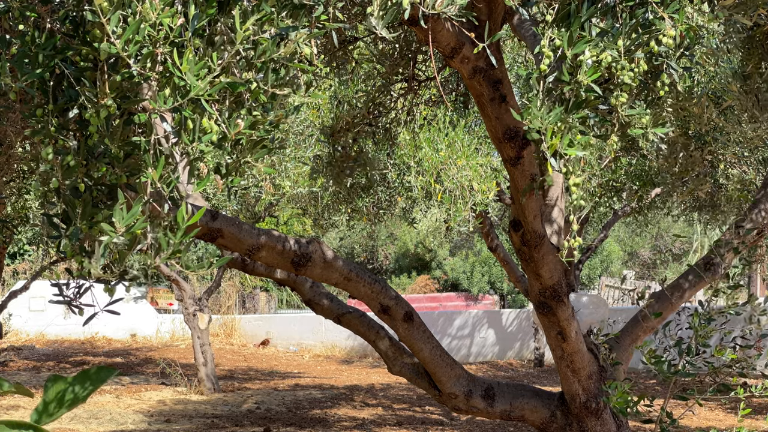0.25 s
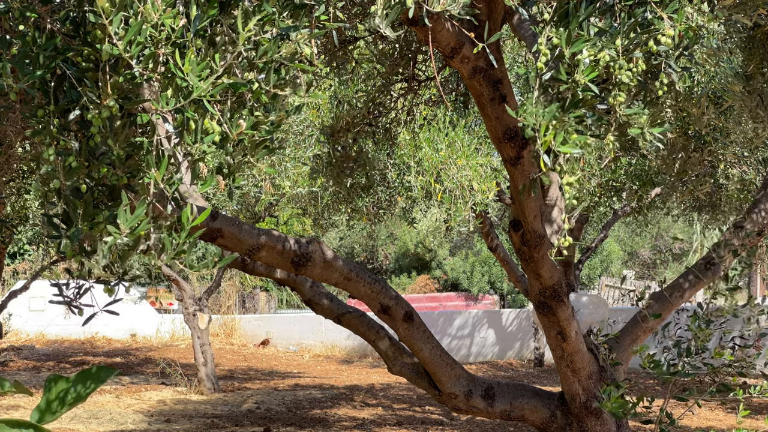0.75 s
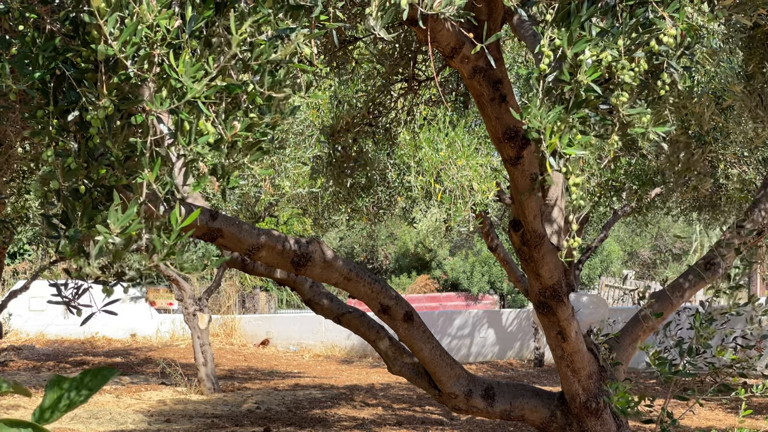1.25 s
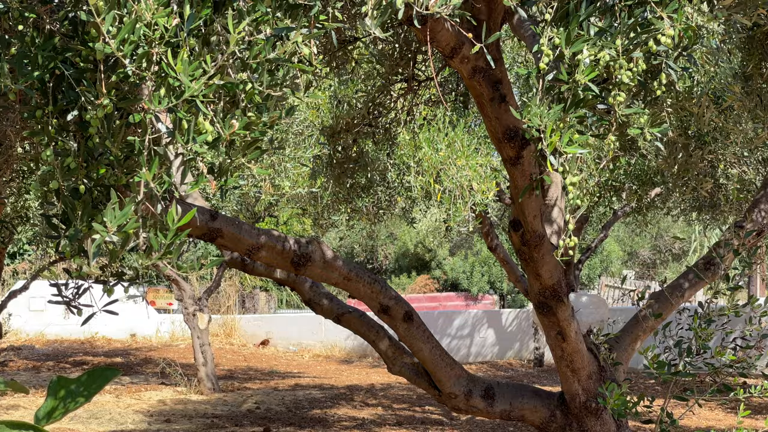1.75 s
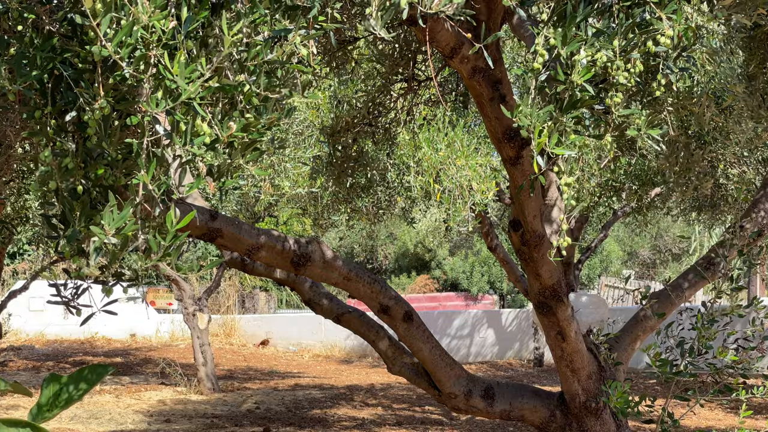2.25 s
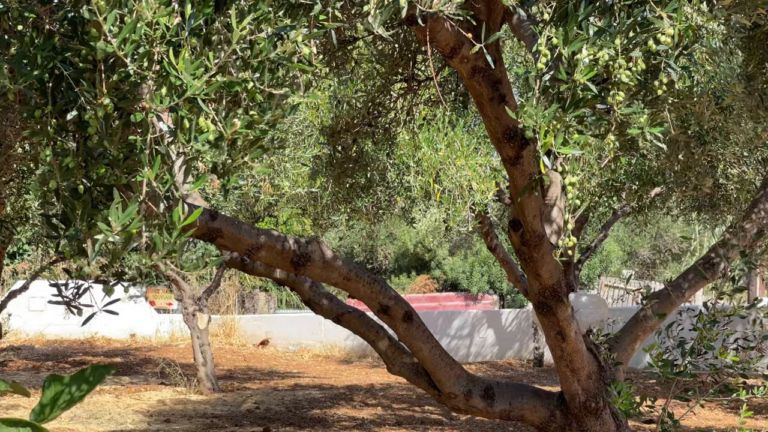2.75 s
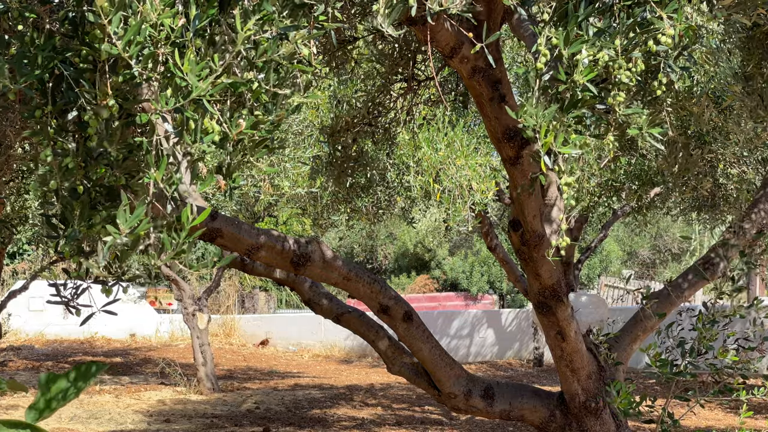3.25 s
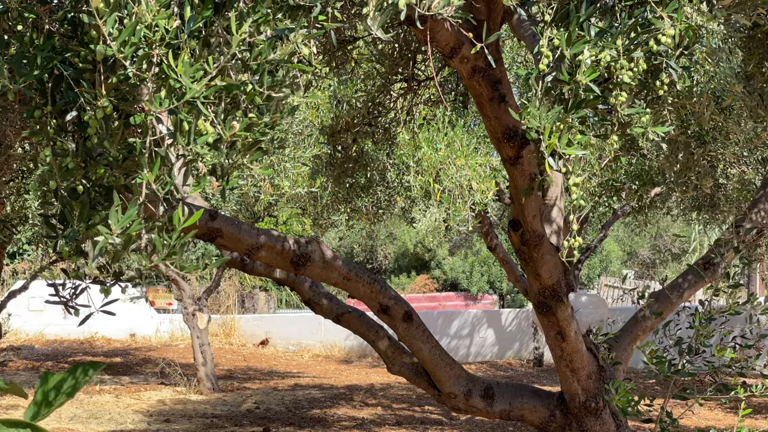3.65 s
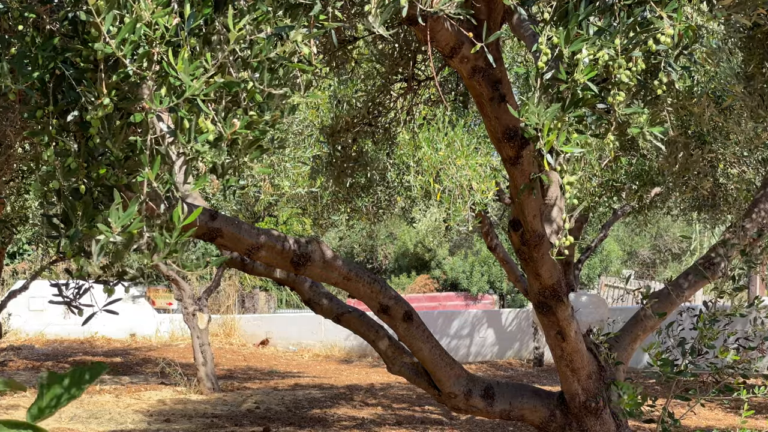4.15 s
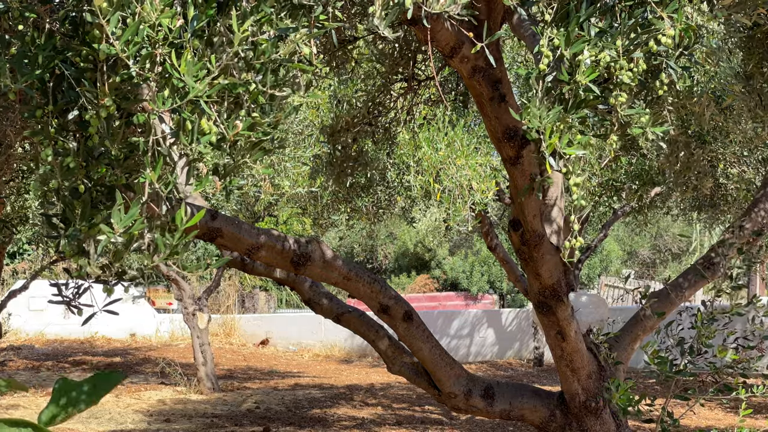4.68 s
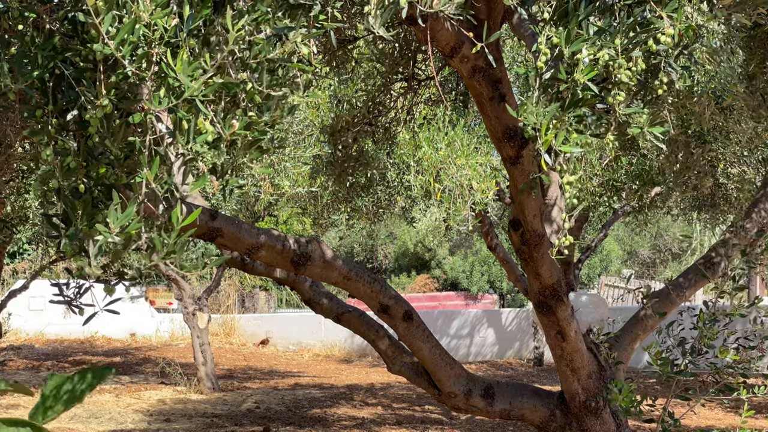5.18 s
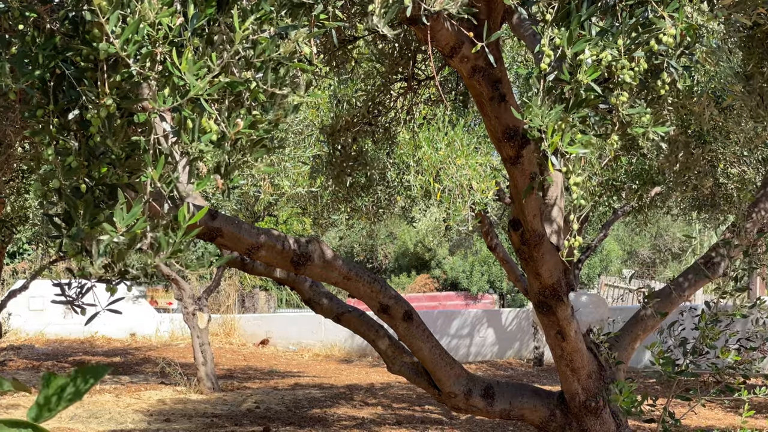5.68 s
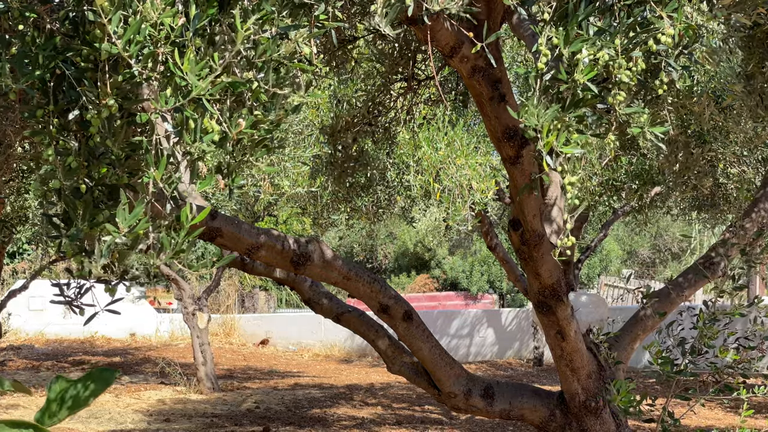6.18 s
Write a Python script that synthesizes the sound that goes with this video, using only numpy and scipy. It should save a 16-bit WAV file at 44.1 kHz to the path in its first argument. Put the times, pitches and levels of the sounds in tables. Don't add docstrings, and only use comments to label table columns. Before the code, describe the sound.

Bright, buzzing cicadas pulse about three times a second in an olive grove, with a distant low motor drone and soft rumble underneath.

```python
import sys
import numpy as np
from scipy import signal
from scipy.fft import rfft, irfft, next_fast_len
from scipy.io import wavfile
from scipy.ndimage import uniform_filter1d, map_coordinates

SR = 44100
rng = np.random.default_rng(int(sys.argv[2]) if len(sys.argv) > 2 else 0)


def to_wav(s):
    ch = np.atleast_2d(s).T
    pcm = np.round(np.clip(ch, -1, 1) * 32767)
    wavfile.write(sys.argv[1], SR, pcm.astype(np.int16))


def decibels_to_gain(level_db):
    exponent = np.asarray(level_db, float) / 20
    return 10 ** exponent


N = 283122
OPPOSITE = np.array([[1], [-1]])


def unit(x):
    return x / np.sqrt(np.mean(x ** 2) + 1e-20)


def along(points, hz):
    f, v = np.transpose(points)
    return np.interp(np.log(hz + 1), np.log(f + 1), v)


def curves(rows):
    s, *cols = np.transpose(rows)
    return [np.interp(np.arange(N) / SR, s, c) for c in cols]


def wobble(rate_hz):
    knots = rng.standard_normal(int(N * rate_hz / SR) + 4)
    return map_coordinates(knots, [np.arange(N) * rate_hz / SR])


def filtered(x, response):
    m = next_fast_len(N + 8192)
    return irfft(rfft(x, m) * response(np.fft.rfftfreq(m, 1 / SR)), m)[..., :N]


def cicadas():
    near, crowd = voices()
    drive = unit(patchy(near + decibels_to_gain(4.0) * crowd, depth_db=0.5))
    overtone_drive = unit(patchy(near + decibels_to_gain(9.0) * crowd, depth_db=1.0))
    song = body(drive, overtone_drive)
    unlike_part = body(*rng.standard_normal((2, N)))
    return song + decibels_to_gain(-16.0) * unlike_part * OPPOSITE


def voices():
    # (time [s], slow singer's share [0-1], fast click rate [Hz])
    turns = [(0, .2, 243), (1.15, .2, 242), (1.25, .8, 241), (1.45, .3, 241), (1.65, .8, 241),
             (1.85, .3, 243), (2.3, .5, 240), (2.6, .9, 246), (3.3, .7, 250), (4.3, .8, 250),
             (4.45, .4, 250), (4.65, .8, 248), (5.05, .9, 250), (5.2, .1, 250), (6.05, .3, 252),
             (6.2, .8, 250), (6.42, .8, 250)]
    slow_hz = 224
    share, fast_hz = curves(turns)
    slow = clicks(slow_hz, sharp=1.1, drift=.006, steady=0.35)
    fast = clicks(fast_hz, sharp=1.1, drift=.006, steady=0.35)
    crowd_hz = rng.uniform(190, 270, size=6)
    crowd = sum(clicks(rate_hz, sharp=0.35, drift=.01, steady=0.35) for rate_hz in crowd_hz)
    near = np.sqrt(share) * slow + np.sqrt(1 - share) * fast
    return unit(near), unit(crowd)


def clicks(rate_hz, sharp, drift, steady):
    turn = np.cumsum(rate_hz * (1 + drift * wobble(5))) / SR + rng.random()
    pull = np.exp(sharp * (np.cos(2 * np.pi * turn) - 1))
    pull_sizes = decibels_to_gain(0.41 * rng.standard_normal(2 * N // 100))
    size = pull_sizes[turn.round().astype(int)]
    ribs = rng.standard_normal(200)[(turn % 1 * 200).astype(int)]
    steady = np.clip(steady, 0, 1)
    crackle = np.sqrt(steady) * ribs + np.sqrt(1 - steady) * rng.standard_normal(N)
    return unit(pull * size * crackle)


def patchy(x, depth_db):
    z = signal.stft(x, nperseg=512)[2]
    field = uniform_filter1d(rng.standard_normal(z.shape), 3, 0)
    field = uniform_filter1d(field, 16, 1)
    return signal.istft(z * decibels_to_gain(depth_db * unit(field)), nperseg=512)[1][:N]


def body(drive, overtone_drive):
    # (frequency [Hz], density [dB per Hz])
    air_sac = [(1500, -74), (1800, -29), (2250, -7.5), (2500, -1), (3000, -0.5), (3280, -3.5),
               (3550, -10.5), (4000, -15), (4400, -33)]
    tymbal_shape = [(3800, -68), (4250, -26), (4800, -9.5), (5050, -1.5), (5300, 0.5), (5500, -3),
                    (5800, -10.5), (6300, -31), (7000, -60)]
    overtones = [(5000, -50.5), (5700, -8), (6100, -1.5), (7000, -6), (7400, -1), (7900, -3.5),
                 (8400, -8.5), (8800, -13), (9500, -14), (10500, -8.5), (11400, -15), (12100, -20)]
    # (frequency [Hz], gain [dB])
    air_loss = [(11900, 3.5), (13200, -8), (13600, -18), (14000, -30), (14500, -90)]
    # (frequency [Hz], width [Hz], level [dB])
    rib_modes = [(2790, 140, 0), (3306, 81, 5), (5290, 180, 3), (5620, 98, 5.5), (7900, 81, 4),
                 (8120, 37, 6), (8560, 70, 7), (9040, 56, 3.5), (11120, 90, 2.5), (12100, 60, 0)]
    tymbal_hz = 5300

    def ring(x, shape, tune):
        def response(hz):
            ribs_db = sum(db / (1 + (2 * (hz - c) / w) ** 2) for c, w, db in rib_modes)
            return decibels_to_gain(along(shape, hz / tune) + along(air_loss, hz) + ribs_db)
        return unit(filtered(x, response))

    tymbal_gain, overtone_gain, sac_gain, pitch_hz = phrasing()
    high = np.clip((pitch_hz / tymbal_hz - .96) / .07, 0, 1)
    tymbal = (1 - high) * ring(drive, tymbal_shape, 0.96) + high * ring(drive, tymbal_shape, 1.0063)
    song = decibels_to_gain(0.4) * tymbal_gain * tymbal
    song = song + decibels_to_gain(0.28) * overtone_gain * ring(overtone_drive, overtones, 1)
    return song + sac_gain * ring(drive, air_sac, 0.99)


def phrasing():
    # (start [s], length [s], level at the stop [dB], tymbal over overtones [dB])
    phrases = [(-0.073, 0.224, -29.0, 1), (0.168, 0.25, -32, 3.5), (0.084, 0.21, -34, -4),
               (0.384, 0.27, -30.0, 2), (0.67, 0.27, -30.5, 1.3), (0.965, 0.27, -32.1, 1.5),
               (1.015, 0.291, -34.0, 2), (1.344, 0.24, -30, 3.1), (1.488, 0.21, -33.5, 1.9),
               (1.713, 0.24, -33, 4), (1.789, 0.25, -32, 1), (1.988, 0.34, -39.5, 0.5),
               (2.132, 0.24, -30, 3.0), (2.47, 0.31, -32.5, 1.0), (2.88, 0.25, -32, 0),
               (2.881, 0.3, -38.5, 3), (3.109, 0.286, -43.5, -1), (3.284, 0.27, -31.5, 0.9),
               (3.622, 0.26, -33.5, 2.5), (4.008, 0.27, -31, 0.6), (4.4, 0.264, -32.4, 1.6),
               (4.48, 0.42, -40.1, 0), (4.798, 0.23, -31, 1.7), (4.974, 0.25, -40, -1.3),
               (5.147, 0.26, -33.0, -3), (5.305, 0.332, -44, -7), (5.534, 0.28, -30, -0.1),
               (5.93, 0.29, -32.5, -0.7), (6.037, 0.24, -34.5, 4), (6.373, 0.22, -34.5, 3)]
    # (time [s], level [dB])
    far_chorus = [
        (0, -37),
        (1.5, -38.5),
        (2.5, -40),
        (3.5, -38.5),
        (4.2, -38),
        (5.5, -38.5),
        (6.42, -38),
    ]
    swell_s, swell_power, sag_db_per_s, stop_s = .136, 1.34, 10, 0.011
    far_tymbal_db, far_sac_db, sac_db = -0.4, 1.6, -10
    start_hz, climb_hz_per_s, far_hz = 5230, 850, 5166

    start, length, stop_db, tymbal_db = np.transpose(phrases)[..., None]
    t = np.arange(0, N, 16) / SR
    since, left = np.clip(t - start, 0, length), start + length - t
    power = np.clip(since / swell_s, 0, 1) ** swell_power * np.exp(np.minimum(left, 0) / stop_s)
    power = power * decibels_to_gain(2 * (stop_db + sag_db_per_s * (length - since)))
    far = decibels_to_gain(2 * curves(far_chorus)[0][::16])
    tymbal = power * decibels_to_gain(2 * tymbal_db)
    far_tymbal = far * decibels_to_gain(2 * far_tymbal_db)
    tymbal_sum = tymbal.sum(0) + far_tymbal
    climbing_hz = start_hz + climb_hz_per_s * since
    pitch_hz = ((tymbal * climbing_hz).sum(0) + far_tymbal * far_hz) / tymbal_sum
    sac = (power.sum(0) + far * decibels_to_gain(2 * far_sac_db)) * decibels_to_gain(2 * sac_db)
    rows = [np.sqrt(tymbal_sum), np.sqrt(power.sum(0) + far), np.sqrt(sac), pitch_hz]
    return [np.interp(np.arange(N) / SR, t, row) for row in rows]


def engine():
    # (time [s], firing rate [Hz], level [dB])
    hum_rows = [(0.0, 71.8, -42.5), (0.39, 67.3, -39.5), (0.5, 65.5, -48), (0.62, 63, -41),
                (0.71, 51.7, -55), (0.88, 57.13, -37.5), (1.43, 57.36, -36), (1.48, 57.55, -49.5),
                (2.04, 58.63, -37.5), (2.63, 60.1, -43.5), (2.73, 60.25, -30), (3.68, 61.6, -42.5),
                (4.18, 60.6, -41), (4.36, 58.7, -58), (4.72, 58.84, -40.5), (5.47, 57.35, -34.5),
                (5.95, 57.15, -39.5), (6.42, 57.5, -38.5)]
    # (time [s], half width [s], gain [dB])
    fades = [(.02, .03, -4), (.53, .02, -8), (.82, 0.035, -8), (1.05, .05, -4.5), (1.2, .05, 3.5),
             (1.29, 0.039, -6), (1.63, 0.035, -7), (2.15, .05, 1), (2.22, 0.022, -7), (2.5, 0.049, 4.5),
             (2.82, .012, -10), (2.86, 0.041, 4.5), (3.42, .025, -1), (3.5, 0.053, 3), (3.97, 0.038, -7),
             (4.16, 0.039, 1), (4.25, .04, -4), (4.5, 0.021, -15), (4.62, 0.029, 0), (4.79, 0.032, 5),
             (5.26, .015, -9), (5.32, 0.058, 3.5)]
    # (time [s], peak level [dB])
    bumps = [
        (2.733, -30),
        (2.797, -24),
        (2.844, -29),
        (3.528, -37),
        (4.791, -48),
        (5.255, -26.5),
        (5.29, -29.5),
    ]
    hz, level_db = curves(hum_rows)
    for s, width, db in fades:
        level_db = level_db + db * np.exp(-((np.arange(N) / SR - s) / width) ** 2)
    phase = 2 * np.pi * np.cumsum(hz + 0.852 * wobble(11)) / SR
    tone = np.sin(phase) + decibels_to_gain(-19) * np.sin(2 * phase)
    hum = np.sqrt(2) * decibels_to_gain(level_db + 0.72 * wobble(20)) * tone
    half = SR // 20
    t = np.arange(-half, half) / SR
    thump = np.cos(2 * np.pi * 85 * t) * np.exp(-(t / 0.0054) ** 2)
    for s, db in bumps:
        hum[round(s * SR) - half:][:len(t)] += decibels_to_gain(db) * thump
    aside = decibels_to_gain(-14.5) * decibels_to_gain(level_db) * np.sin(phase + 2.0 * wobble(6))
    return (hum + aside * OPPOSITE) * decibels_to_gain([[-.4], [.4]])


def rumble():
    # (frequency [Hz], density [dB per Hz])
    spectrum = [(15, -60), (25, -28), (42, -8.5), (66, -5), (100, -7), (150, -13), (210, -15), (315, -24.5),
                (700, -27.5), (1200, -32.5), (1450, -38), (1800, -35.5), (2400, -56)]
    # (frequency [Hz], correlation [0-1])
    alike = [(60, 0.96), (170, 0.92), (360, 0.69), (730, 0.16), (1040, 0), (1500, 0.12)]
    # (frequency [Hz], left minus right [dB])
    tilt = [(60, -1), (200, 0), (510, 1.5), (1040, 1.5), (1800, 0.5)]

    def shape(hz):
        angle = np.arccos(np.clip(along(alike, hz), -1, 1)) / 2
        return decibels_to_gain(along(spectrum, hz)) * [np.cos(angle), np.sin(angle)]

    mid, side = filtered(rng.standard_normal((2, N)), shape)
    pair = np.array([mid + side, mid - side])
    pair = filtered(pair, lambda hz: decibels_to_gain(along(tilt, hz) / 2 * OPPOSITE))
    return decibels_to_gain(-46.5 + 1.3 * wobble(8)) * unit(pair)


def scene():
    return cicadas() + engine() + rumble()


def microphone_ports(dry):
    # (frequency [Hz], left lead [rad])
    lead = [(2150, 0), (3200, .68), (3900, .35), (4700, .6), (5400, .55), (6400, .2), (7300, .25),
            (7850, .58), (8500, .1), (8850, -.45), (9200, -1.3), (10290, -3.14), (11650, -5.8),
            (12300, -6.5), (13250, -9.2)]
    return filtered(dry, lambda hz: np.exp(.5j * along(lead, hz) * OPPOSITE))


def joint_stereo(pair):
    # (frequency [Hz], margin [dB])
    margin = [(900, 25), (1400, 9), (2200, 11), (3000, 15), (4000, 11), (5200, 17), (6300, 10), (7300, 10),
              (7900, 15), (8700, 10), (11700, 11), (12900, 5)]
    scatter_db = 2
    left, right = pair
    shift, bins = 90, 12
    mid_side = np.pad([left + right, left - right], ((0, 0), (shift, 0))) / 2
    hz, _, z = signal.stft(mid_side, SR, "cosine", 2048)
    band = np.arange(len(hz)) // bins
    power = np.add.reduceat(abs(z) ** 2, np.arange(0, len(hz), bins), axis=1)
    margin_db = along(margin, hz[::bins] + 130)[:, None]
    floor = decibels_to_gain(2 * (scatter_db * rng.standard_normal(power.shape) - margin_db)) * power.sum(0)
    weak = (power < floor)[:, band]
    mid, side = signal.istft(z * ~weak, SR, "cosine", 2048)[1][:, shift:N + shift]
    return np.array([mid + side, mid - side])


def roll_off(x):
    return signal.sosfilt(signal.butter(12, 13850, fs=SR, output="sos"), x)


def record(dry):
    mix = joint_stereo(microphone_ports(dry))
    return roll_off(mix)


dry = scene()
out = record(dry)
to_wav(out)
```